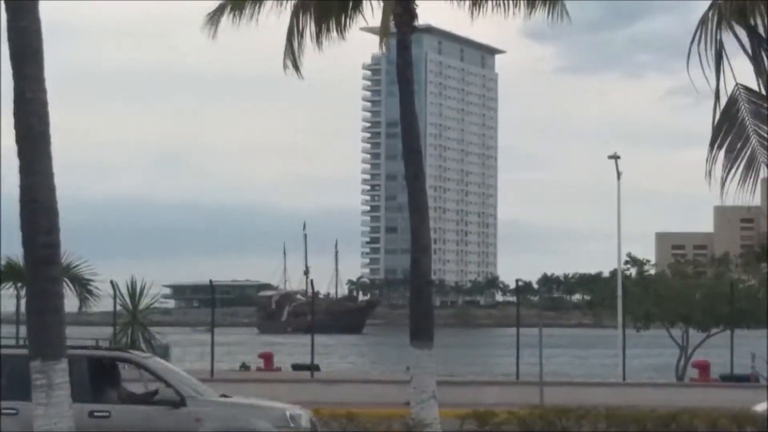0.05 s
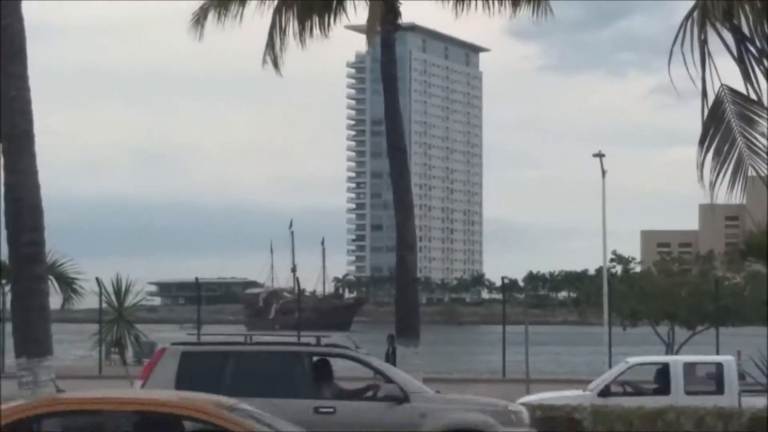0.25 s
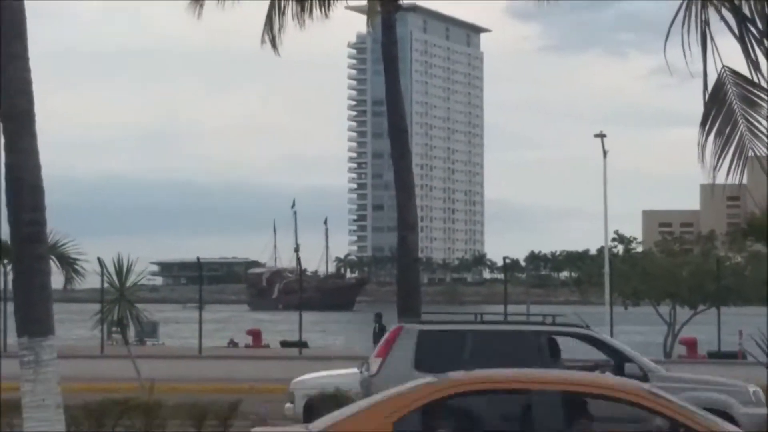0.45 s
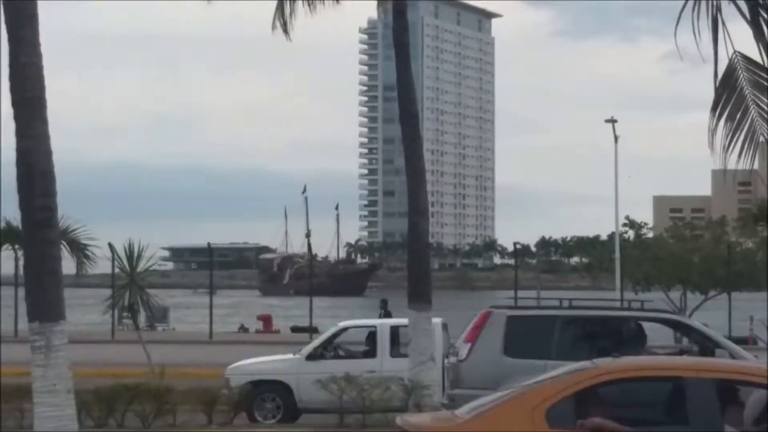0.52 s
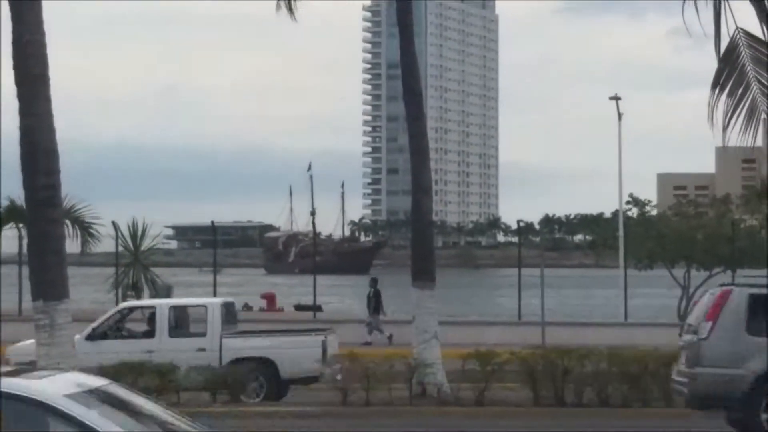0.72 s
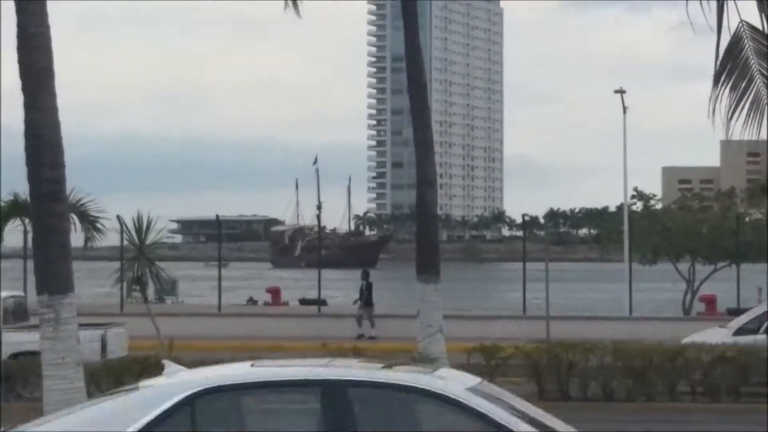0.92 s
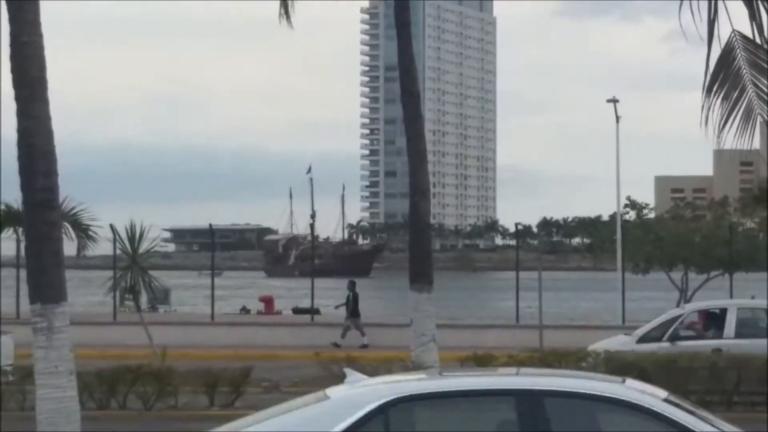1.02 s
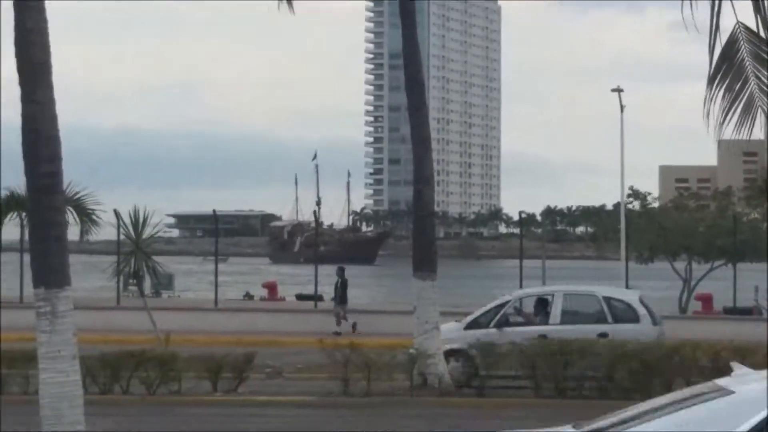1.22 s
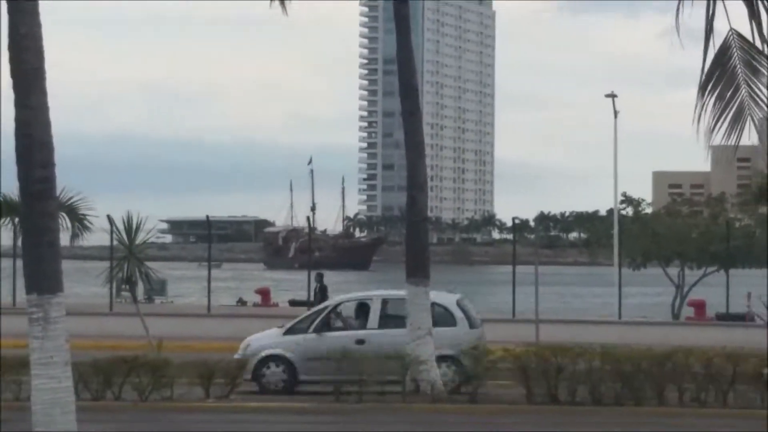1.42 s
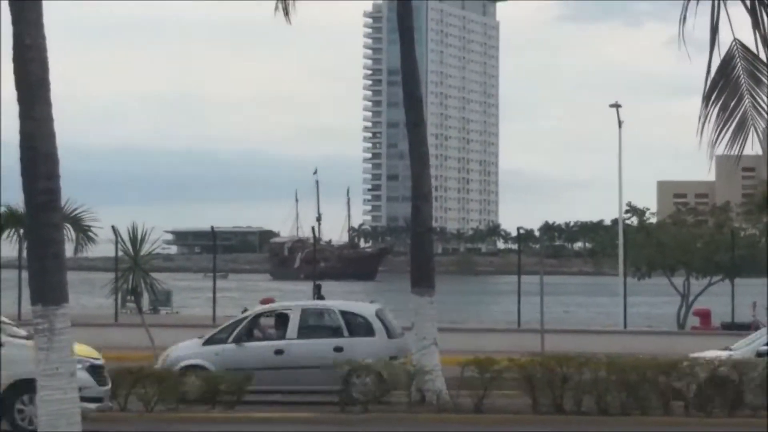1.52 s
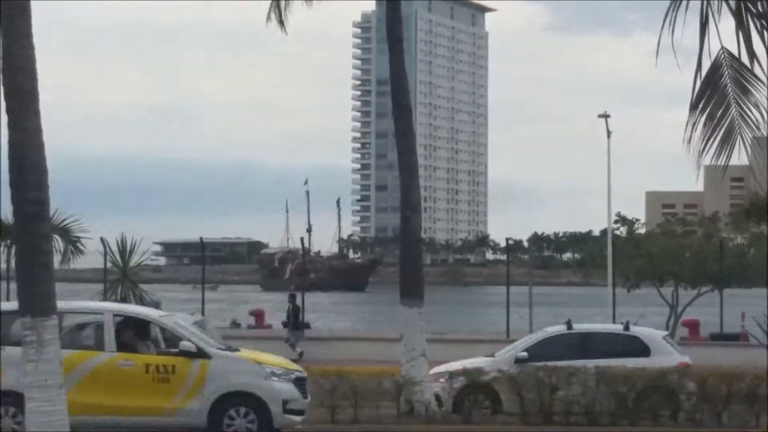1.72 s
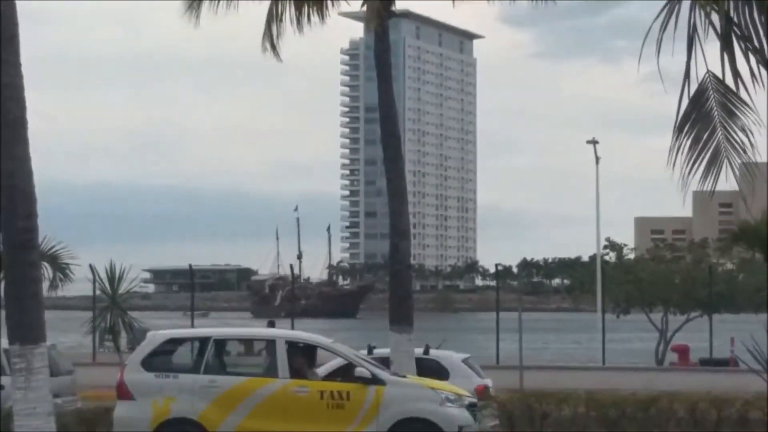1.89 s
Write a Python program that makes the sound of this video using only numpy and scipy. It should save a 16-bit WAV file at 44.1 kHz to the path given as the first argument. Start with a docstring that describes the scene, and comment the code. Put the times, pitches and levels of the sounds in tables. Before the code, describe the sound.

A car's tyres squeal on a busy road. First its engine revs up over road rumble and hiss. At about 0.4 seconds a high, ragged squeal breaks in, loudest from 0.7 to 1 second as the engine and hiss drop away. It wavers and stutters from right to left, dying by 1.4 seconds. Other cars then roll by quietly with a low drone and a brief falling whine.

```python
"""A car pulls away hard on a busy road: its engine revs up over the rumble and hiss of its tyres. A spinning
tyre scrubs, then its tread sticks and slips in a wavering squeal that moves right to left. The pipe rings
briefly; the engine and the road's rush drop in level while the squeal is at its loudest. As the squeal dies,
other cars roll by with a low drone and a falling whine."""
import sys
import numpy as np
from scipy.fft import rfft, irfft
from scipy.io import wavfile

SR = 44100
rng = np.random.default_rng(int(sys.argv[2]) if len(sys.argv) > 2 else 0)


def unload_wav(signal):
    """Save mono or channel-first audio to the path in sys.argv[1] as 16-bit WAV at rate SR, clipped to [-1, 1]."""
    wavfile.write(
        sys.argv[1],
        SR,
        np.round(np.clip(np.atleast_2d(signal).T, -1, 1) * 32767).astype(np.int16),
    )


N = 85995
T = np.arange(N) / SR
BIN_HZ = np.fft.rfftfreq(N, 1 / SR)
SIDES = np.array([[.5], [-.5]])  # splits a left-minus-right difference


def from_db(db):
    """Decibels to gain."""
    return 10 ** (np.asarray(db) / 20)


def unit_rms(x):
    """Scale to unit power."""
    return x / np.sqrt(np.mean(x ** 2) + 1e-20)


def over_time(table):
    """Each value column of a time table, per sample."""
    time_s, *columns = np.transpose(table)
    return [np.interp(T, time_s, column) for column in columns]


def over_freq(table):
    """A frequency table per FFT bin, on a log axis."""
    freq_hz, value = np.transpose(table)
    return np.interp(np.log(BIN_HZ + 1), np.log(freq_hz), value)


def drift(rate_hz):
    """Unit-RMS random wander, low-passed at rate_hz."""
    return unit_rms(irfft(rfft(rng.standard_normal(N)) / (1 + (BIN_HZ / rate_hz) ** 4), N))


# Left-right likeness of the noise: freq_hz, correlation
STEREO_CORRELATION = [(30, -0.52), (50, -0.26), (90, 0.12), (300, 0.7), (700, 0.77), (1150, 0.97),
                      (1400, 0.026), (1700, -.35), (2100, -0.64), (2400, -0.81), (2950, -0.017), (3550, 1),
                      (3850, 0.67), (4100, -0.058), (4400, -0.44), (4750, -0.84), (5850, 0.85), (7000, -.8),
                      (8000, 0.81), (9200, -0.66), (10400, .75), (11600, -0.64), (12900, 0.49),
                      (14100, -.4), (15500, .6)]


def tyre_noise(spectrum, level, balance, flutter_db):
    """Fluttering stereo rush; a share arrives from one side, so the channels are out of step."""
    side_share, delay_s = .25, .00043
    side_lead = side_share * np.sin(2 * np.pi * BIN_HZ * delay_s)
    coherence = np.clip(over_freq(STEREO_CORRELATION), -1, 1) + 1j * side_lead
    left, independent = rfft(rng.standard_normal((2, N)))
    right = coherence * left + np.sqrt(np.maximum(1 - abs(coherence) ** 2, 0)) * independent
    colour = from_db(over_freq(spectrum) + over_freq(balance) * SIDES)
    gain = from_db(over_time(level)[0] + flutter_db * drift(17))
    return unit_rms(irfft(colour * [left, right], N)) * gain


def engine_tone(curve, orders, flutter, wobble, spread_rad, pan_db):
    """Multiples of a base rate, each swelling by itself and reaching the two sides out of step."""
    rate_hz, level_db = over_time(curve)
    phase = 2 * np.pi * np.cumsum(rate_hz * (1 + wobble * drift(15.8))) / SR
    tone = 0
    for multiple, gain_db in orders:
        offset_rad = spread_rad * SIDES * (1 + .5 * drift(3.2))
        gain = from_db(gain_db) * (1 + flutter * drift(31))
        tone = tone + gain * np.sin(multiple * phase + offset_rad + rng.uniform(0, 2 * np.pi))
    return np.sqrt(2) * tone * from_db(level_db + pan_db * SIDES)


# Approaching engine: time_s, firing_hz, level_db
COMING_ENGINE = [(.7, 152.8, -72), (.95, 152.3, -63), (1.2, 151, -55.5), (1.45, 146.8, -51.5),
                 (1.56, 146, -48), (1.63, 147.8, -40), (1.85, 154.4, -39.5), (1.95, 160, -37.5)]
# Its partials: multiple, gain_db
COMING_ORDERS = [(.8, -19), (1, -2.5), (2, -10), (3.6, -10), (4.5, -14.5), (5, -12.5)]
# Receding car's drone: time_s, pitch_hz, level_db
GOING_DRONE = [(.75, 312.4, -56), (.95, 307, -50), (1.15, 302, -54), (1.33, 302, -49), (1.46, 299.8, -54.5),
               (1.6, 295.3, -74)]
# Its partials: multiple, gain_db
GOING_ORDERS = [(1, 0.5), (2, -0.5)]
# Passing car's whine: time_s, pitch_hz, level_db
PASSING_WHINE = [(1.1, 774, -65), (1.25, 775.3, -52), (1.38, 764, -49.5), (1.45, 753, -42.5),
                 (1.53, 730, -52), (1.62, 720, -70)]
# Wash of tyre noise: freq_hz, density_db
WASH_SPECTRUM = [(25, -14), (60, -2), (160, 1.5), (400, -9), (650, -3.5), (1100, -10.5), (2500, -13),
                 (3400, -14), (4400, -20.5), (6000, -20), (9000, -30.5), (15800, -35.5)]
# Its envelope: time_s, level_db
WASH_LEVEL = [(0, -29), (.7, -45), (0.919, -43.5), (1.13, -47), (1.35, -39.5), (1.551, -38), (1.7, -38),
              (1.87, -35), (1.95, -35.5)]
# Its balance: freq_hz, left_minus_right_db
WASH_BALANCE = [(200, -3), (750, -5), (1400, -1), (2000, -1), (3000, 1), (7000, -.5), (15000, -1.3)]


def traffic():
    """Other cars: two engine notes and a falling whine in a wash of tyre noise."""
    coming = engine_tone(COMING_ENGINE, COMING_ORDERS,
                         flutter=.2, wobble=.006, spread_rad=.98, pan_db=-6)
    going = engine_tone(GOING_DRONE, GOING_ORDERS, flutter=.085, wobble=.0045, spread_rad=.6, pan_db=-2)
    whine = engine_tone(PASSING_WHINE, [(1, 0)], flutter=.19, wobble=.006, spread_rad=.3, pan_db=-3.5)
    wash = tyre_noise(WASH_SPECTRUM, WASH_LEVEL, WASH_BALANCE, flutter_db=1.32)
    return coming + going + whine + wash


# Road rumble: freq_hz, density_db
RUMBLE_SPECTRUM = [(25, -28.5), (50, -17), (80, -4.5), (140, -4), (210, -2.5), (310, -7.5), (500, -9),
                   (1100, -10), (1800, -14.5), (2600, -25.5), (5000, -29.5)]
# Its envelope: time_s, level_db
RUMBLE_ENVELOPE = [(0, -30.5), (.1, -27), (.35, -27), (.58, -25.5), (.69, -28.5), (.74, -44), (0.848, -39),
                   (.9, -54.5), (1.201, -57.5), (1.95, -50.5)]
# Road hiss: freq_hz, density_db
HISS_SPECTRUM = [(800, -7), (1800, 4.5), (2600, 3), (3700, 2.5), (5000, -2.5), (7000, -6.5), (10500, -9),
                 (12500, -19.5), (14500, -18.5), (15800, -20)]
# Its envelope: time_s, level_db
HISS_ENVELOPE = [(0, -44), (.12, -35.5), (.24, -37), (.33, -32), (.41, -27.5), (.55, -28), (.63, -30.5),
                 (.70, -27), (.735, -40.5), (.855, -39.5), (.88, -45.5), (.99, -41), (1.101, -49),
                 (1.21, -50), (1.319, -44), (1.42, -49.5), (1.95, -63)]
# Near car's noise balance: freq_hz, left_minus_right_db
CAR_BALANCE = [(200, -0.3), (600, 4.5), (1050, 0), (1700, -4.5), (2800, 1.5), (4600, -1.5), (8000, -0.5),
               (11500, 0.7), (15000, -0.5)]


def road_rush():
    """The near car's tyres rumble and hiss on the road."""
    rumble = tyre_noise(RUMBLE_SPECTRUM, RUMBLE_ENVELOPE, CAR_BALANCE, flutter_db=.7)
    hiss = tyre_noise(HISS_SPECTRUM, HISS_ENVELOPE, CAR_BALANCE, flutter_db=1.9)
    return rumble + hiss


# Revving engine: time_s, firing_hz, level_db
REV_CURVE = [(0, 67.34, -27), (0.081, 72.64, -25), (.25, 85.15, -22), (.33, 91.54, -23),
             (.38, 97.34, -24.5), (.44, 105.7, -29.5), (.55, 117.6, -29), (.61, 123.7, -33),
             (.66, 129.4, -43), (0.699, 133.5, -52), (.75, 131.3, -64), (1.0, 140, -68)]
# Its partials: multiple, gain_db
REV_ORDERS = [(1, -1.5), (1.5, -15), (2, -9.5), (2.5, -14.5), (3, -15), (4, -16), (5, -23)]
# Pipe ring: time_s, level_db
PIPE_LEVEL = [(.45, -65), (.55, -43), (.61, -29), (.66, -31.5), (.71, -35), (.78, -88.5)]


def revving_engine():
    """The firing rate climbs; the pipe rings briefly at five times that rate."""
    motor = engine_tone(REV_CURVE, REV_ORDERS, flutter=.21, wobble=.0036, spread_rad=1, pan_db=1.4)
    pipe_curve = [(time_s, firing_hz, 0) for time_s, firing_hz, _ in REV_CURVE]
    pipe = engine_tone(pipe_curve, [(5, .008)], flutter=.47, wobble=.0088, spread_rad=.4, pan_db=3)
    return motor + pipe * from_db(over_time(PIPE_LEVEL)[0])


# Rubber rasp: freq_hz, density_db
SCRUB_SPECTRUM = [(500, -33.5), (900, -12), (1130, -7), (1270, -6.5), (1420, -7.5), (1800, -12),
                  (2600, -46)]
# Its envelope: time_s, level_db
SCRUB_ENVELOPE = [(0, -80), (.3, -33.5), (.42, -28), (.5, -24.5), (.58, -22.5), (0.689, -23),
                  (0.761, -33.5), (.86, -31.5), (.9, -40), (1.0, -39), (1.151, -46), (1.33, -46),
                  (1.39, -47), (1.95, -74)]


def tyre_scrub():
    """Spinning rubber rasps in a band round the squeal's pitch."""
    return tyre_noise(SCRUB_SPECTRUM, SCRUB_ENVELOPE, CAR_BALANCE, flutter_db=3)


def squeal_overtone(cycles, multiple, steady, ragged, rate_hz, spread_rad, pan_db):
    """One complex overtone: part steady, part ragged, out of step between the sides."""
    gain = (steady + ragged * (drift(rate_hz) + 1j * drift(rate_hz))) * from_db(pan_db * SIDES)
    return gain * np.exp(1j * (2 * np.pi * multiple * cycles + spread_rad * SIDES))


# Stick-slip rate of the tread: time_s, pitch_hz
SLIP_PITCH = [(.36, 1336), (.40, 1340), (.47, 1249), (.55, 1240), (.59, 1285), (.63, 1288), (.657, 1237),
              (.68, 1290), (.752, 1253), (.785, 1272), (.797, 1234), (.815, 1284), (.86, 1287),
              (.892, 1224), (.915, 1247), (.94, 1231), (.975, 1218), (1.015, 1258), (1.05, 1214),
              (1.08, 1231), (1.09, 1134), (1.104, 1270), (1.125, 1250), (1.162, 1310), (1.203, 1226),
              (1.22, 1347), (1.246, 1222), (1.275, 1294), (1.335, 1252), (1.47, 1255)]
# Squeal strength as the tyre grips and slips: time_s, level_db
SLIP_LEVEL = [(.33, -57), (.389, -40), (.393, -24), (.40, -14), (.406, -58), (.455, -33), (.481, -12.5),
              (.496, -23), (.52, -16), (.555, -17), (.58, -12), (.605, -14), (.624, -8), (.642, -24.5),
              (.666, -22), (.69, -7.5), (.712, -6.5), (.748, -7), (.758, -6), (.784, -7.5), (.798, -27),
              (.811, -15), (.822, -33.5), (.832, -9), (.841, -27.5), (.85, -5.5), (.857, -4.5),
              (.874, -8.5), (.888, -29), (.908, -9), (.924, -14.5), (.94, -4.5), (.963, -9), (.974, -9),
              (.99, -6), (.997, -19), (1.01, -7), (1.024, -16), (1.078, -12.5), (1.09, -19), (1.112, -14),
              (1.119, -18.5), (1.139, -10), (1.153, -18.5), (1.168, -12), (1.192, -19), (1.212, -28.5),
              (1.252, -15), (1.285, -29), (1.294, -22.5), (1.334, -15.5), (1.35, -23), (1.365, -45.5),
              (1.414, -41.5), (1.432, -51), (1.449, -37.5), (1.475, -52)]
# Squeal timbre: time_s, roughness_0_to_1, second_harmonic_db, third_harmonic_db
SLIP_TIMBRE = [(.40, 0.3, -35, -23), (.46, 0.83, -40, -32), (.56, 0.62, -45, -18.5), (.69, 0.23, -37, -43),
               (.735, 0.2, -24.5, -36), (.79, 0.08, -43, -41.5), (.87, 0.05, -24.5, -38.5),
               (.905, 0.11, -30, -47), (.96, 0.14, -20, -38.5), (1.08, 0.23, -8.5, -27.5),
               (1.112, .09, -8.5, -35.5), (1.13, 0.05, -25, -35.5), (1.21, 0.11, -24, -37),
               (1.29, 0.24, -3, -18), (1.35, 0.16, -16, -33), (1.42, 0.61, -23, -27)]
# Car's path, right to left: time_s, left_minus_right_db, left_lag_ms
CAR_PATH = [(.40, -3, -0.05), (.62, -2, 0.031), (.85, 0, 0.0094), (1.0, 1.5, .035), (1.06, 2, .04),
            (1.34, 4.5, 0.041)]


def tyre_squeal():
    """The tread sticks and slips: a wavering near-sine, ragged at first, with two weaker overtones."""
    waver_rms_hz, waver_rate_hz, chatter_rate_hz = 9.6, 64, 132
    pitch_hz, = over_time(SLIP_PITCH)
    level_db, = over_time(SLIP_LEVEL)
    roughness, second_db, third_db = over_time(SLIP_TIMBRE)
    pan_db, lag_ms = over_time(CAR_PATH)
    cycles = np.cumsum(pitch_hz + waver_rms_hz * drift(waver_rate_hz)) / SR
    cycles = cycles - SIDES * pitch_hz * lag_ms / 1000
    chatter = (drift(chatter_rate_hz) + 1j * drift(chatter_rate_hz)) / np.sqrt(2)
    grip = np.sqrt(1 - roughness ** 2) + roughness * chatter
    second = squeal_overtone(cycles, 2.012, steady=.74, ragged=.27,
                             rate_hz=160, spread_rad=4.13, pan_db=-5)
    third = squeal_overtone(cycles, 3, steady=.35, ragged=.54, rate_hz=150, spread_rad=1.6, pan_db=-4.5)
    partials = np.exp(2j * np.pi * cycles) + from_db(second_db) * second + from_db(third_db) * third
    return np.sqrt(2) * np.real(grip * partials) * from_db(level_db + pan_db * SIDES)


def scene():
    """The whole road, heard from the kerb."""
    return tyre_squeal() + tyre_scrub() + revving_engine() + road_rush() + traffic()


def record(dry):
    """Clip at full scale, then low-pass steeply."""
    cutoff_hz = 15800
    freq_hz = np.fft.rfftfreq(2 * N, 1 / SR)
    spectrum = rfft(np.clip(dry, -1, 1), 2 * N)
    return irfft(spectrum / np.sqrt(1 + (freq_hz / cutoff_hz) ** 200), 2 * N)[:, :N]


dry = scene()
out = record(dry)
unload_wav(out)
```